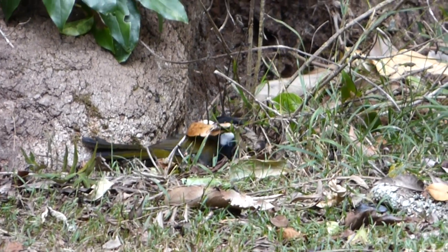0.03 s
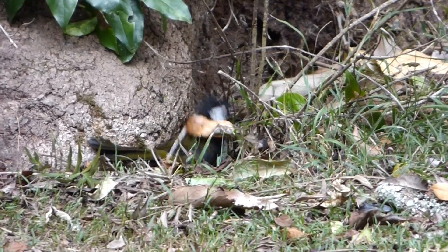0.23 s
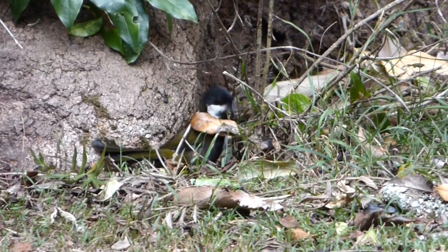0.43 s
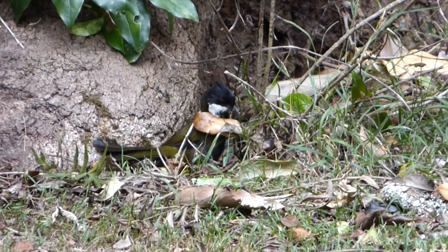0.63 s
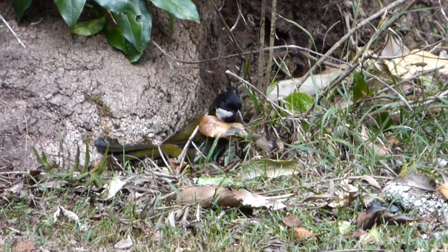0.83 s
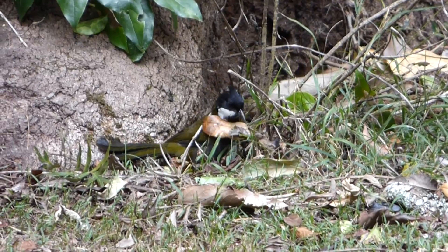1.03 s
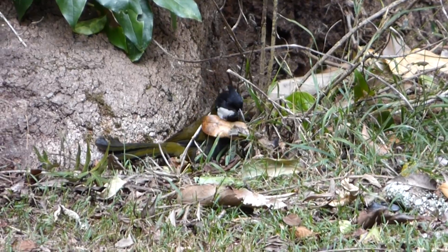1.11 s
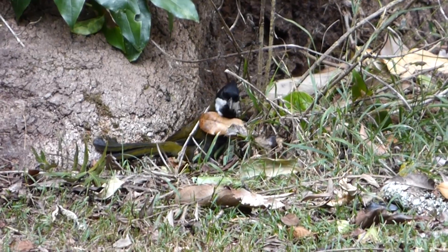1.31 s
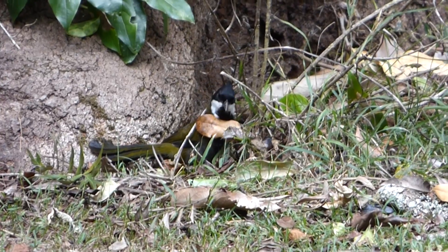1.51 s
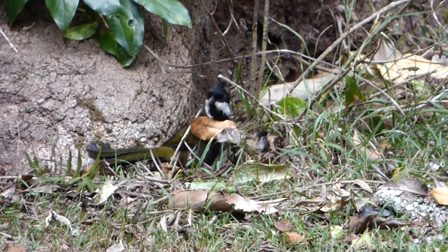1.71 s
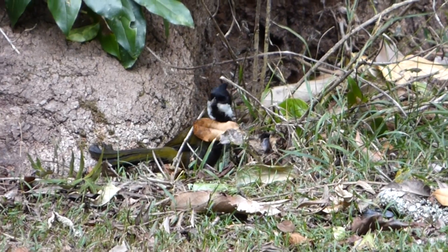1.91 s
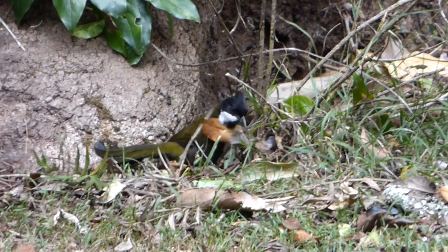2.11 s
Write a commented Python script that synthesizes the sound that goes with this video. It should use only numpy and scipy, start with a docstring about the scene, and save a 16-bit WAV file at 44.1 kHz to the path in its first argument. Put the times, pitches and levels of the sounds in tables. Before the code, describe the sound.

Five quick upward bird whistles, each followed by a short falling note, echoing among trees.

```python
"""Whipbird in the forest

A whipbird on the forest floor gives five evenly spaced rising whistles, nearly pure tones, each
followed by a short, weaker falling note. Trunks and foliage scatter them into a long ring.
Tiny dry clicks sound by the bird, and other birds call faintly far off. Underneath are a low rush
and a thin, slowly swelling hiss, with a faint fluttering mechanical hum and soft ticks."""
import sys
import numpy as np
from scipy import signal
from scipy.fft import rfft, irfft, next_fast_len
from scipy.io import wavfile
from scipy.ndimage import map_coordinates

SR = 44100
rng = np.random.default_rng(int(sys.argv[2]) if len(sys.argv) > 2 else 0)


def wav_out(sig):
    """Save sig, one row per channel (or a flat mono array), as 16-bit PCM at SR to the path in sys.argv[1]."""
    wavfile.write(sys.argv[1], SR, np.round(np.clip(np.atleast_2d(sig).T, -1, 1) * 32767).astype(np.int16))


N = 94815
T = np.arange(N) / SR


# one contour per rising whistle: (time [s], pitch [Hz], level [dB])
WHISTLE_CONTOURS = [
    [(.203, 4630, -52), (.22, 4834, -42.5), (.242, 5040, -33), (.25, 5140, -37.5), (.265, 5380, -31),
     (.287, 5757, -33.5), (.303, 5660, -31)],
    [(.522, 3740, -68), (.545, 4060, -51), (.561, 4350, -44.5), (.577, 4430, -42.5), (.586, 4975, -33),
     (.609, 5306, -25.5), (.625, 5540, -31), (.635, 5600, -52)],
    [(.848, 3780, -70), (.865, 4066, -52.5), (.897, 4407, -44), (.92, 4530, -46), (.937, 4760, -37.5),
     (.943, 5194, -32), (.956, 5322, -30), (.979, 5467, -34)],
    [(1.21, 3690, -67), (1.23, 4067, -50.5), (1.255, 4276, -44), (1.269, 4700, -39.5), (1.278, 4690, -37.5),
     (1.285, 4964, -29.5), (1.299, 5164, -24.5), (1.309, 5354, -30), (1.326, 5455, -26.5),
     (1.339, 5380, -39.5)],
    [(1.58, 3270, -74), (1.6, 3780, -53), (1.62, 4100, -47.5), (1.634, 4585, -37.5), (1.648, 4520, -38),
     (1.667, 4910, -30.5), (1.688, 5337, -25), (1.711, 5304, -35.5)],
]
# each whistle's send to the forest ring as the head turns: (send [dB])
WHISTLE_SENDS = [0, 1.5, 1.5, -2, -5.5]


def whipbird_whistles():
    """Upward sweeps that swell towards the top, each thrown into the trees."""
    out = np.zeros((2, N))
    for contour, send_db in zip(WHISTLE_CONTOURS, WHISTLE_SENDS):
        times, hz, db = np.transpose(contour)
        envelope = gate(times[0], times[-1])
        whistle = voice(np.interp(T, times, hz), np.interp(T, times, db), envelope, waver=0.0062)
        out += forest(whistle, send_db)
    return out


# the note after each whistle: (start [s], length [s], top pitch [Hz], end pitch [Hz], level [dB])
FALLING_NOTES = [(.356, 0.036, 5190, 4906, -31.5), (0.695, 0.046, 5224, 4580, -37),
                 (1.041, 0.036, 5283, 4680, -31.5), (1.402, 0.0277, 5120, 4525, -34),
                 (1.779, 0.051, 4395, 4014, -46)]


def whipbird_notes():
    """A quick flick up, then a short fall; a deeper waver makes these huskier than the whistles."""
    rise_s, scoop = 0.0092, 0.19  # each note starts this share below its top pitch
    out = np.zeros((2, N))
    for start, length, top_hz, end_hz, db in FALLING_NOTES:
        top, end = start + rise_s, start + length
        hz = np.interp(T, [start, top, end], [top_hz * (1 - scoop), top_hz, end_hz])
        swell_db = np.interp(T, [start, top, start + 0.79 * length, end], [-21.5, -2, 0, -13])
        note = voice(hz, db + swell_db, gate(start, end), waver=0.01296)
        out += forest(note, send_db=0)
    return out


# EQ on the whipbird's overtones: (frequency [Hz], gain [dB])
OVERTONE_EQ = [(7000, 9), (8000, 3.5), (9300, -6.5), (10700, -2.5), (11700, -5.5), (13200, -6),
               (15000, -18), (16500, -22)]


def voice(hz, db, envelope, waver):
    """A nearly pure, unsteady tone with faint, flickering second and third harmonics."""
    hz = hz * (1 + waver * wobble(rate=400))
    phase = 2 * np.pi * np.cumsum(hz) / SR
    overtones = 0
    for k in (2, 3):
        colour_db = along(OVERTONE_EQ, k * hz) + 4 * wobble(rate=120)
        overtones += amp(colour_db) * np.sin(k * phase)
    overtone_db = -59 + 0.19 * (db + 30)  # the overtones barely follow the swell
    tone = amp(db) * np.sin(phase) + amp(overtone_db) * overtones
    flutter = amp(2.5 * wobble(rate=160))
    return np.sqrt(2) * envelope * flutter * tone


# reverb time of the trees, shorter in the treble: (frequency [Hz], t60 [s])
FOREST_DECAY = [(4000, 1), (5300, 0.78), (7500, 0.44), (12000, 0.25)]


def forest(call, send_db):
    """A call arrives directly, off the near ground and trunk, and from the trees beyond."""
    near_db, ring_db = -4.5, -7
    close_pan, ring_pan = amp([[-4], [2.1]]), amp([[0.5], [1.5]])  # left, right
    near = echoes(call, t60=0.12, build_s=0.006, correlation=0.93)
    ring = echoes(call, t60=FOREST_DECAY, build_s=0.024, correlation=0.77)
    close = call + amp(near_db) * near
    return close_pan * close + ring_pan * amp(ring_db + send_db) * ring


# faint clicks by the bird: (time [s], level [dB])
DRY_CLICKS = [(.353, -52), (.637, -52), (.846, -51), (0.978, -54)]


def clicks():
    """Tiny dry clicks, perhaps of the beak or the leaf litter."""
    envelope = sum(amp(db) * bump(time, length_s=0.008) for time, db in DRY_CLICKS)
    return envelope * band(centre_hz=6900, width_hz=1300)


# distant calls: (start [s], length [s], start pitch [Hz], end pitch [Hz], level [dB], echo send [dB])
DISTANT_CALLS = [(0.088, 0.063, 2074, 2141, -62, 3.5), (0.117, 0.019, 1812, 1633, -51, -1),
                 (0.809, 0.047, 1830, 1944, -57, 4), (0.817, 0.033, 1752, 1680, -57, -4),
                 (1.049, 0.32, 1583, 1482, -63, 2.5), (1.008, 0.199, 2131, 2077, -64.5, -6),
                 (1.219, 0.21, 1782, 1668, -63.5, 0), (1.253, .25, 1990, 1931, -64, 5),
                 (1.351, 0.18, 2186, 2145, -66, 1), (1.942, 0.0306, 3170, 3800, -66, -17),
                 (1.965, .028, 6250, 5850, -53, -13)]


def far_birds():
    """Faint, wavering glides, blurred by their echoes."""
    out = np.zeros((2, N))
    for start, length, from_hz, to_hz, db, send_db in DISTANT_CALLS:
        glide_hz = np.interp(T, [start, start + length], [from_hz, to_hz])
        hz = glide_hz * (1 + 0.012 * wobble(rate=140))
        call = amp(db) * gate(start, start + length) * np.sin(2 * np.pi * np.cumsum(hz) / SR)
        out += call + amp(send_db) * echoes(call, t60=1, build_s=0.0078, correlation=0.72)
    return out


# EQ of the low rush: (frequency [Hz], relative level [dB])
RUSH_EQ = [(15, -68), (25, -20.5), (70, -15.5), (146, -7.5), (286, -3.5), (357, -3), (387, -12),
           (465, -3.5), (570, -5.5), (657, -2), (773, 2.5), (873, -9.5), (986, -2.5), (1160, -8),
           (1280, -3.5), (1390, -9.5), (1890, -14), (2310, -18.5), (3200, -25.5), (4160, -62), (7040, -120)]


def rush():
    """A low bed of noise whose level wavers slightly."""
    level_db = -52 + 1.17 * wobble(rate=30)
    return amp(level_db) * noise(lambda hz: amp(along(RUSH_EQ, hz)))


# narrow bands of the hum: (centre [Hz], half-width [Hz], level [dB], left over right [dB])
HUM_BANDS = [(468, 29.4, -61, -5.5), (670, 46, -61.5, 5.5), (783, 31, -59, -0.5)]


def hum():
    """A faint mechanical hum: narrow bands of noise that flutter together."""
    flutter = unit(amp(1.5 * wobble(rate=45)))
    out = np.zeros((2, N))
    for hz, width, db, pan_db in HUM_BANDS:
        out += amp([[db + pan_db / 2], [db - pan_db / 2]]) * band(hz, width)
    return flutter * out


# blips in the bed, and a faint far chorus near 2 s: (peak time [s], length [s], centre [Hz], half-width [Hz],
# level [dB])
BED_SWELLS = [(0.089, 0.013, 704, 170, -56), (0.348, 0.0092, 653, 250, -46), (1.009, .04, 690, 120, -50),
              (1.154, 0.043, 615, 200, -54.5), (1.36, 0.074, 314, 77, -56), (1.844, .02, 700, 102, -48),
              (2.075, 0.17, 498, 120, -50.5), (0.843, 0.077, 1800, 111, -53.5),
              (1.016, 0.15, 1850, 90, -57), (1.392, .06, 6650, 300, -56.5), (1.997, 0.5, 6540, 453, -60.5)]


def swells():
    """Narrow bands of noise rise and fall as brief swells and soft mechanical ticks; the long high band near 2
    s is a faint chorus of far-off birds."""
    return sum(amp(db) * bump(time, length) * band(hz, width)
               for time, length, hz, width, db in BED_SWELLS)


# EQ of the hiss: (frequency [Hz], relative level [dB])
HISS_EQ = [(1500, -20), (3000, -8), (4500, -0.5), (6500, -2), (8000, -2.5), (10500, -6), (12000, -11.5),
           (13500, -15), (15700, -22)]
# fader ride on the hiss: (time [s], level [dB])
HISS_FADER = [(0, -60), (.6, -58), (1.4, -56.5), (2.15, -57.5)]


def hiss():
    """Thin, high noise that slowly swells, a touch to the right."""
    level_db = np.interp(T, *np.transpose(HISS_FADER))
    pan = amp([[-0.6], [0.6]])
    return pan * amp(level_db) * noise(lambda hz: amp(along(HISS_EQ, hz)))


# stereo image of the background noise: (frequency [Hz], left-right correlation [-1 to 1])
NOISE_IMAGE = [(30, 0.57), (60, 0.65), (130, 0.91), (250, 1), (380, 0.59), (500, 0.014), (750, -0.66),
               (1100, -0.066), (1600, 0.17), (2500, 0.54), (4000, 0.84), (8000, 0.59), (15000, 0.46)]


def noise(gain):
    """Stereo background noise of rms 1, coloured by gain(Hz)."""
    def mid_side_gain(hz):
        spread = np.arccos(along(NOISE_IMAGE, hz)) / 2
        return gain(hz) * np.array([np.cos(spread), np.sin(spread)])
    mid, side = filtered(rng.standard_normal((2, N)), mid_side_gain)
    return unit(np.array([mid + side, mid - side]))


def band(centre_hz, width_hz):
    """Stereo noise in one band, 6 dB down at width_hz either side of the centre."""
    return noise(lambda hz: 1 / (1 + ((hz - centre_hz) / width_hz) ** 2))


def echoes(x, t60, build_s, correlation):
    """Stereo scatter of x that builds up, then dies; t60 is seconds or (Hz, s) points."""
    hz, t, spectrum = signal.stft(rng.standard_normal((2, SR)), SR, nperseg=256)
    decay_s = t60 if np.isscalar(t60) else along(t60, hz)[:, None]
    tail = signal.istft(spectrum * np.exp(-np.log(1000) * t / decay_s), SR, nperseg=256)[1]
    tail *= 1 - np.exp(-np.arange(tail.shape[1]) / SR / build_s)
    mid, side = signal.fftconvolve(x[None], tail, axes=1)[:, :N]
    spread = np.arccos(correlation) / 2
    mid, side = np.cos(spread) * unit(mid), np.sin(spread) * unit(side)
    return x.std() * np.array([mid + side, mid - side])


def gate(start, end, attack_s=0.0065, release_s=0.018):
    """Soft attack, hold and release of one note."""
    fade_in = np.clip((T - start) / attack_s + .5, 0, 1)
    fade_out = np.clip((end - T) / release_s + .5, 0, 1)
    return np.sin(fade_in * fade_out * np.pi / 2) ** 2


def bump(centre_s, length_s):
    """A smooth rise and fall."""
    return np.exp(-(2 * (T - centre_s) / length_s) ** 2)


def wobble(rate):
    """A smooth random curve, rate knots a second."""
    return map_coordinates(rng.standard_normal(N // 8), [T * rate], mode="wrap")


def filtered(x, response):
    """x through an EQ whose gain is response(Hz)."""
    size = next_fast_len(N + SR // 4)
    return irfft(rfft(x, size) * response(np.fft.rfftfreq(size, 1 / SR)), size)[..., :N]


def along(points, hz):
    """Read (Hz, value) points on a log frequency axis."""
    knots_hz, values = np.transpose(points)
    return np.interp(np.log(hz + 1), np.log(knots_hz + 1), values)


def amp(db):
    """Decibels to gain."""
    return 10 ** (np.asarray(db) / 20)


def unit(x):
    """Scale to rms 1."""
    return x / np.sqrt(np.mean(x ** 2) + 1e-20)


def scene():
    """Near and far birds over a low rush and hiss, with a faint mechanical hum and soft ticks."""
    birds = whipbird_whistles() + whipbird_notes() + clicks() + far_birds()
    return birds + rush() + hum() + swells() + hiss()


def record(dry):
    """A brick-wall low-pass on the whole mix."""
    cutoff_hz = 15750
    return filtered(dry, lambda hz: hz < cutoff_hz)


dry = scene()
out = record(dry)
wav_out(out)
```